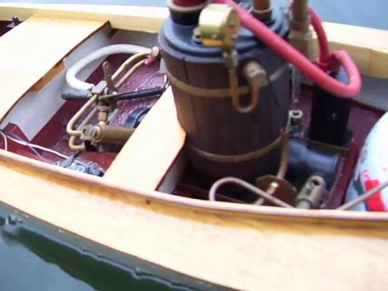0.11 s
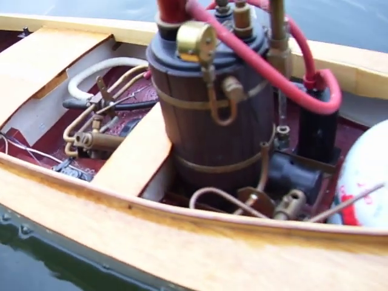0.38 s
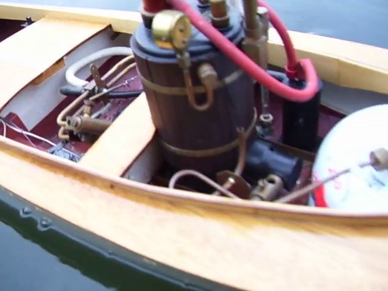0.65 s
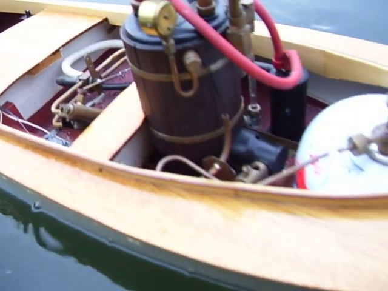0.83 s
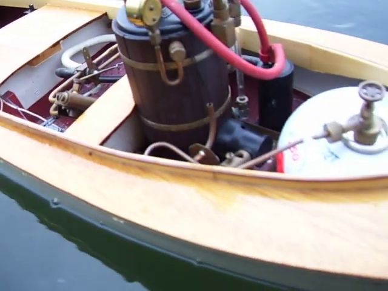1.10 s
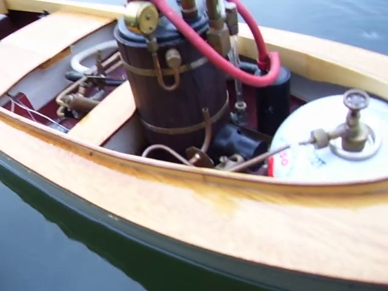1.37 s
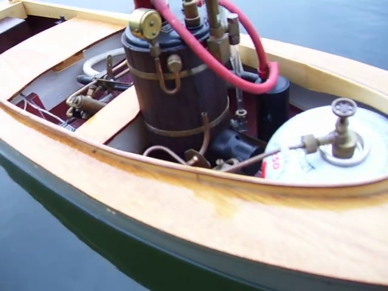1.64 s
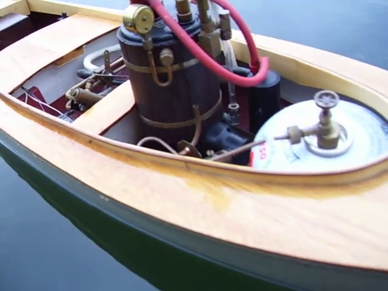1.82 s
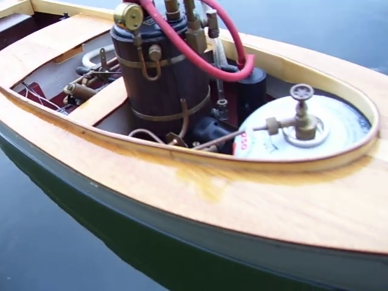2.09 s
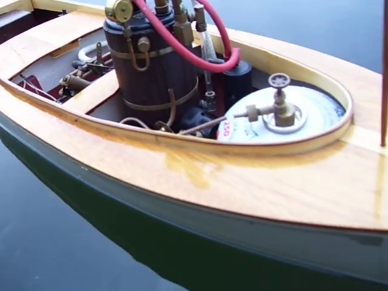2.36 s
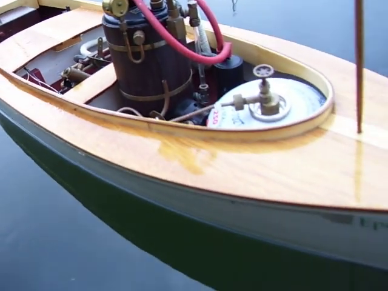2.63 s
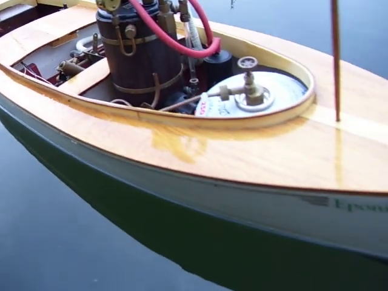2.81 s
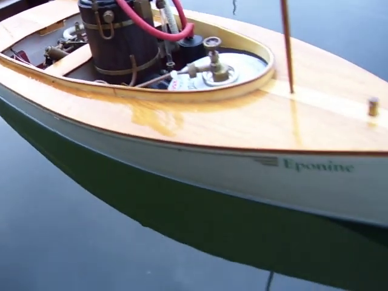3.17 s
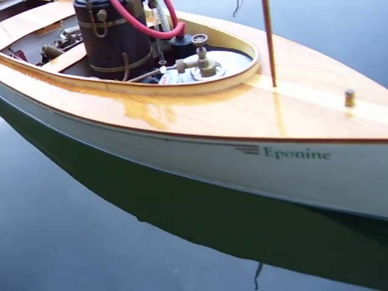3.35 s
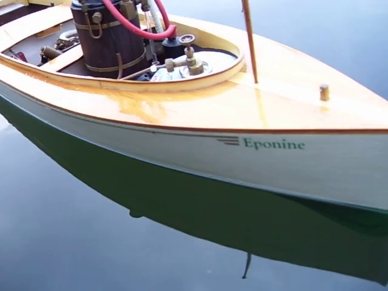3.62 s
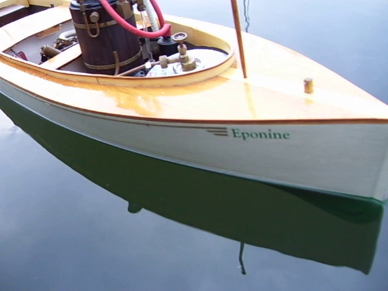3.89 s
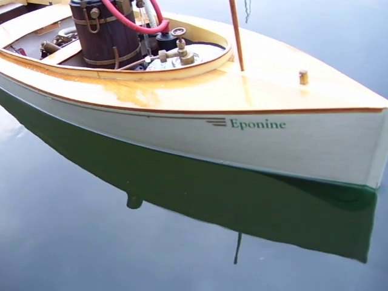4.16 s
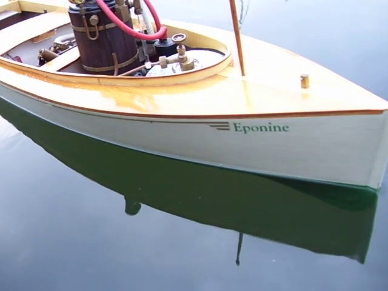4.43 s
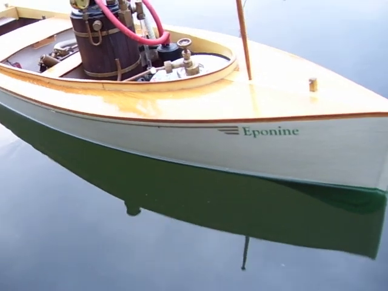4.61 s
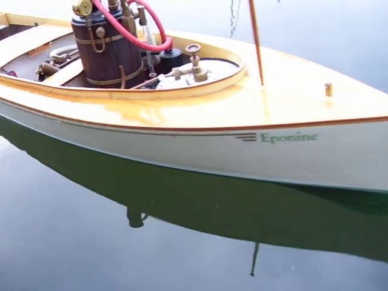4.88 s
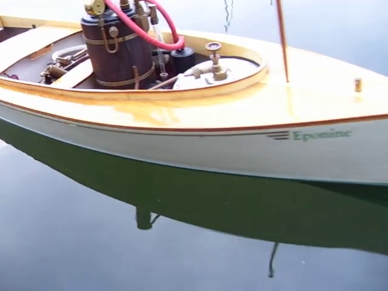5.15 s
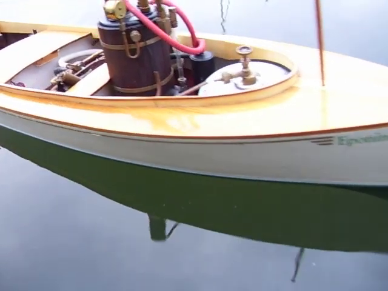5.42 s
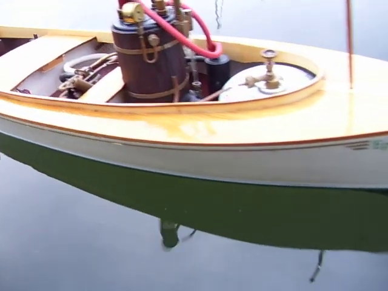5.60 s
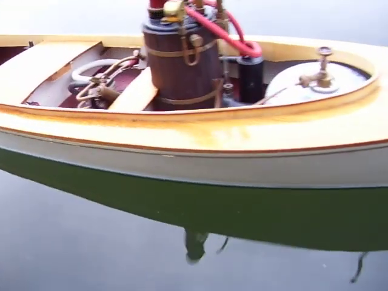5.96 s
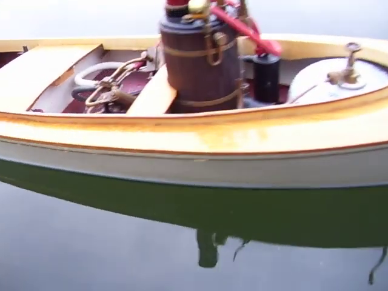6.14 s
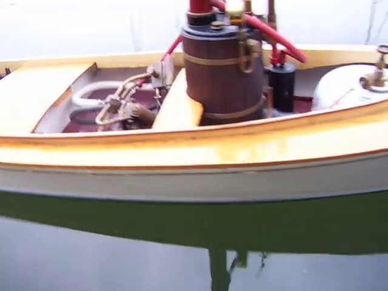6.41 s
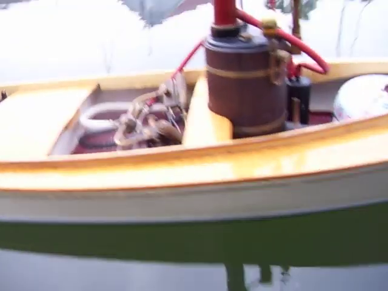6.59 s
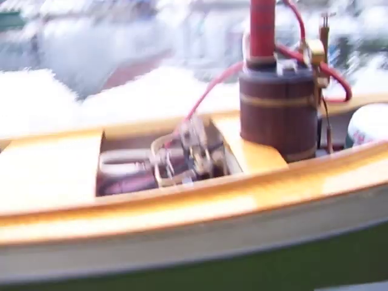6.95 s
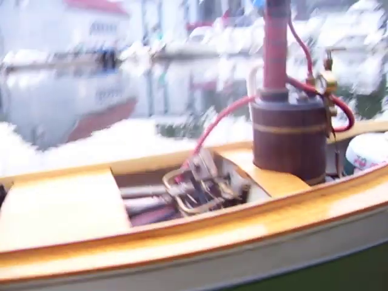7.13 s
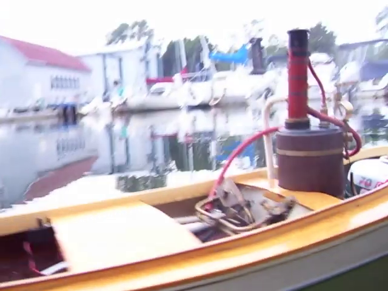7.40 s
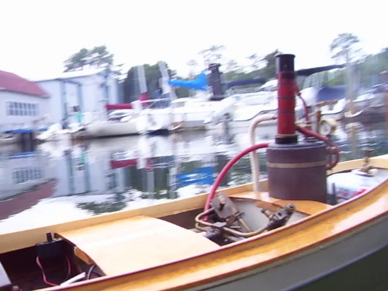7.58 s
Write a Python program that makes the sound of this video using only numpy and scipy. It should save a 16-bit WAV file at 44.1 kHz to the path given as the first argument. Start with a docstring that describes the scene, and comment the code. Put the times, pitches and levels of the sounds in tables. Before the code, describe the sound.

A model steam boat runs on calm water, close to a microphone that picks up little treble. Its gas burner roars steadily throughout, with a sputtering hiss of steam and a faint whistle that fades by 4 seconds. The engine gives wet, hollow chuffs in fits: a short run at the start, another from about 1.5 to 2 seconds, and a third from 2.5 to 3.3, with faint stray puffs between. A valve squeaks faintly at 1.5 and 2.3 seconds, and a little longer around 3.5. A light clack comes at 1.7 seconds and a sharper one at 2.4. From about 3.6 seconds the chuffs settle into a fast, even beat, growing louder as the boat passes and peaking around 6.5 to 7 seconds. A sharp clack lands at 7.2 seconds and a brief, louder squeal at 7.7. The loudest peaks overload slightly.

```python
"""A model steam launch chuffs past on calm water, close to a microphone that hears little treble.
Wet exhaust spits up its funnel and makes the tube ring, at first in fits, then in a fast beat.
The gas burner roars steadily with a faint whistle, spent steam hisses, and faint chuffs come at
random moments. A valve squeals four times and there are three sharp clacks.
The loudest peaks overload the microphone."""
import sys
import numpy as np
from scipy.fft import rfft, irfft, next_fast_len
from scipy.io import wavfile
from scipy.ndimage import uniform_filter1d, map_coordinates

SR = 44100
rng = np.random.default_rng(int(sys.argv[2]) if len(sys.argv) > 2 else 0)


def pcm_store(signal):
    """Save signal as 16-bit PCM."""
    levels = np.round(np.clip(np.atleast_2d(signal), -1, 1) * 32767)
    wavfile.write(sys.argv[1], SR, levels.astype(np.int16).T)


N = 342216

# the flame's tone colour: pitch_hz, level_db
FLAME_SPECTRUM = [(20, -41.5), (55, -13), (120, -8.5), (230, -2.5), (330, -2), (450, 2), (600, -4),
                  (900, -2), (1250, -11.5), (1450, -9.5), (1850, -16.5), (2150, -12), (2700, -28.5)]
# the low drone and upper ring of the flue, the pipe the flame burns in: pitch_hz, width_hz, gain_db
FLUE_MODES = [(606, 72, 2.5), (1477, 220, -1.5)]
# the upper ring fades as the boiler moves away: time_s, gain_db
FLUE_RING_FADE = [(0, 0.5), (2.3, -0.5), (4, -3.5), (7.76, -6)]
# how loud the burner roars: time_s, level_db
ROAR_LEVELS = [(0, -30.5), (1.7, -31.5), (3.4, -33), (6.3, -30.5), (7.76, -30.5)]
# the tone colour of spent steam: pitch_hz, level_db
HISS_SPECTRUM = [(600, -18), (1500, -7.5), (2300, 2), (3300, 6), (4500, -9)]
# the flow of spent steam, heard as hiss: time_s, level_db
STEAM_FLOW = [(0, -30.5), (.43, -40.5), (.84, -48.5), (1.36, -45.5), (1.69, -37.5), (2.1, -47.5),
              (3.26, -42), (3.46, -37), (4.36, -38), (6.03, -31), (6.51, -30), (7.39, -37.5), (7.76, -31)]
# the echo from the funnel's open ends: pitch_hz, gain_db
FUNNEL_ECHO = [(250, -34.5), (600, -13), (1400, -9.5), (2200, -27), (3500, -23.5)]
# how loud the burner whistles: time_s, level_db
WHISTLE_LEVELS = [(0, -48), (1.5, -46), (2.6, -51.5), (4, -62)]

# the crank, turning about eight to ten times a second: time_s, turns_done
CRANK_TURNS = [(-.021, 0), (.189, 2), (1.679, 15), (1.792, 16), (1.926, 17), (2.654, 23), (2.781, 24),
               (2.914, 25), (3.166, 27), (3.749, 32), (4.346, 37), (4.809, 41), (5.171, 44), (5.63, 48),
               (6.294, 54), (6.824, 59), (7.664, 67)]
# two cylinders push both ways, giving four strokes a turn that drift as the beat settles;
# one table per stroke: time_s, place_in_turn (0-1), ring_accent_db, spit_accent_db
STROKE_PATTERNS = [
    [(3.3, 0, 1, 0.5), (5.6, 0, 0, 1.5), (6.3, 0, -2, 2), (7.1, 0, -2.5, 2.5)],
    [(3.3, 0.28, 2, 3), (3.7, .31, 1, -3), (5.55, .30, .5, -3), (5.85, .30, 4, -1), (6.05, .30, 0, -2.5),
     (6.33, 0.31, 4.5, -2.5), (6.6, .325, 3.5, -3.5), (7.4, .325, 2, -0.5)],
    [(3.3, 0.46, -0.5, -2.5), (3.7, .42, -14.5, -8), (5.6, .43, -10, -11.5), (6.5, .43, -6.5, 4.5),
     (7.4, 0.43, -3, -5.5)],
    [(3.3, .67, -4, 0), (3.7, .59, 1, 3.5), (5.6, .58, 3.5, -0.5), (6.5, .565, -0.5, 0)],
]
# chuff strength, greatest as the funnel passes the microphone: time_s, ring_db, spit_db
CHUFF_LEVELS = [(.1, -18, -22.5), (1.7, -20.5, -27.5), (2.9, -19.5, -26), (3.3, -22, -27.5),
                (3.8, -17, -26.5), (4.05, -21.5, -26), (4.4, -19.5, -25), (5.1, -17, -23), (5.8, -15, -24),
                (6.5, -11, -22.5), (7.1, -11.5, -20), (7.5, -15, -20.5), (7.72, -15.5, -18)]
# stretches of time in which the strokes chuff: start_s, end_s
CHUFF_SPELLS = [(0, .26), (1.66, 1.98), (2.64, 3.33), (3.64, 7.75)]
# single exhaust chuffs, alone or accenting a stroke of the beat: start_s, ring_db, spit_db
SINGLE_CHUFFS = [(1.52, -18, -24.5), (1.855, -14.5, -26), (2.5, -20, -27), (2.606, -18.5, -31.5),
                 (2.654, -29, -25.5), (3.091, -22, -22.5), (3.561, -22.5, -27.5), (3.656, -17.5, -30),
                 (3.912, -14.5, -25), (4.178, -18, -26), (4.509, -29, -20.5)]
# the smokebox, a chamber under the funnel that rounds each kick: pitch_hz, width_hz, gain_db
SMOKEBOX_MODES = [(860, 480, 0)]
# the hollow bark of the exhaust: pitch_hz, width_hz, gain_db
BARK_MODES = [(643, 76, -4), (884.3, 66, 1), (1081, 115, -3.5)]
# hollows of the open hull, each heard while it faces the microphone:
# pitch_hz, width_hz, gain_db, facing_s, spread_s
HULL_MODES = [(736, 150, 3.5, 6.35, 0.85), (423, 110, 10, 7.49, 0.37), (825, 83, 4.5, 7.4, 0.4),
              (1058, 170, 5, 7.656, 0.76)]
# the tone colour of a spit of wet steam: pitch_hz, level_db
SPIT_SPECTRUM = [(200, -22.5), (500, -2), (1100, 0.5), (1650, 4.5), (2200, 2), (2700, 0.5), (3400, -0.5),
                 (4500, -8)]

# the valve, one table per squeal: time_s, pitch_hz, level_db
VALVE_SQUEALS = [
    [(1.44, 3200, -41), (1.525, 3360, -28.5), (1.545, 3210, -57)],
    [(2.26, 3100, -46), (2.30, 3240, -33), (2.35, 3140, -40)],
    [(3.32, 2775, -31), (3.355, 3130, -26.5), (3.412, 3406, -26.5), (3.45, 3170, -30), (3.475, 3206, -25),
     (3.525, 3260, -27.5), (3.545, 3284, -24.5), (3.59, 3110, -25.5), (3.61, 3200, -46.5)],
    [(7.668, 2785, -29), (7.69, 2986, -12), (7.716, 2950, -27)],
]
# how much of each squeal is hiss rather than tone: hiss_share (0-1)
SQUEAL_HISS_SHARES = [.88, .9, .3, .12]
# sharp clacks: start_s, level_db
CLACK_HITS = [(1.681, -23.5), (2.4292, -11), (7.2394, -8.5)]
# the notes a clack rings with: pitch_hz, level_db, ring_s (time to fall by 60 dB)
CLACK_NOTES = [(1270, -6, .026), (1900, 0, .018), (2230, -4, .013), (2950, -8, .011), (3480, -6, .008)]
# the tone colour of the crack that starts a clack: pitch_hz, level_db
CRACK_SPECTRUM = [(800, -26), (1700, 4), (4200, -4), (5000, -30.5)]
# how the microphone loses treble: pitch_hz, gain_db
MIC_RESPONSE = [(3450, -2), (3800, -9), (4200, -17), (4500, -31), (4800, -72.5), (5200, -110)]


def amp(db):
    """Turn decibels into a number to multiply by."""
    return 10 ** (np.asarray(db) / 20)


def unit(x):
    """Scale each sound to an average (rms) level of 1."""
    return x / np.sqrt(np.mean(x ** 2, axis=-1, keepdims=True) + 1e-20)


def shape(points, hz):
    """The gain at each pitch, joining up rows of pitch_hz, gain_db."""
    pitch_hz, gain_db = np.transpose(points)
    return amp(np.interp(np.log(hz + 1), np.log(pitch_hz), gain_db))


def read(rows, times):
    """Look up each column after time_s at the given times."""
    time_s, *columns = np.transpose(rows)
    return [np.interp(times, time_s, column) for column in columns]


def curves(rows):
    """Look up each column after time_s at every sample."""
    return read(rows, np.arange(N) / SR)


def wobble(rate):
    """A smooth curve through `rate` random values a second."""
    return map_coordinates(rng.standard_normal(int(N * rate / SR) + 4), [np.arange(N) * rate / SR])


def filtered(x, response):
    """Make each pitch in x stronger or weaker, as response(hz) says."""
    size = x.shape[-1]
    padded = next_fast_len(2 * size)
    return irfft(rfft(x, padded) * response(np.fft.rfftfreq(padded, 1 / SR)), padded)[..., :size]


def resonances(modes, hz):
    """How a hollow space answers: it rings near each of its modes, the pitches it favours."""
    return sum((-1) ** k * amp(db) * 1j * hz * width / (pitch ** 2 - hz ** 2 + 1j * hz * width)
               for k, (pitch, width, db) in enumerate(modes))


def noise(spectrum):
    """Steady noise with the given tone colour."""
    return unit(filtered(rng.standard_normal(N), lambda hz: shape(spectrum, hz)))


def bursts(count, rise_s, decay_s, size=2600):
    """Puffs of swirling air that swell fast and fall more slowly, each with energy 1."""
    t = np.arange(size) / SR
    envelope = (1 - np.exp(-(t / rise_s) ** 2)) * np.exp(-t / decay_s)
    return unit(rng.standard_normal((count, size)) * envelope) / np.sqrt(size)


def placed(start_s, level_db, sounds, span_s=.01):
    """Lay short sounds on the time line; each has its level as if squeezed into span_s."""
    size = sounds.shape[1]
    sounds = unit(sounds) * np.sqrt(span_s * SR / size) * amp(level_db)[:, None]
    samples = np.round(np.maximum(start_s, 0) * SR).astype(int)[:, None] + np.arange(size)
    return np.bincount(samples.ravel(), sounds.ravel(), N)[:N]


def funnel(hz, lowest_note_hz=293.1):
    """Sound bounces up and down the open tube, which boosts evenly spaced pitches."""
    echo = np.minimum(shape(FUNNEL_ECHO, hz), .9)
    return 1 / (1 - echo * np.exp(-2j * np.pi * hz / lowest_note_hz))


def boiler(roar_gain_db=5.0, hiss_gain_db=3, flicker_db=0.63, sputter_db=3.0):
    """The flame roars in its flue and spent steam sputters, both sounding through the funnel."""
    roar_db, = curves(ROAR_LEVELS)
    hiss_db, = curves(STEAM_FLOW)
    ring_db, = curves(FLUE_RING_FADE)
    flame = noise(FLAME_SPECTRUM)
    drone, ring = (filtered(flame, lambda hz: resonances([mode], hz)) for mode in FLUE_MODES)
    flue = unit(flame + drone + amp(ring_db) * ring)
    roar = amp(roar_db + roar_gain_db + flicker_db * wobble(30)) * flue
    hiss = amp(hiss_db + hiss_gain_db + sputter_db * wobble(140)) * noise(HISS_SPECTRUM)
    return filtered(roar + hiss, funnel)


def burner_whistle(pitch_hz=1577, waver_hz=4, flutter_db=3.0):
    """The burner's gas jet sings on one faint, unsteady note."""
    level_db, = curves(WHISTLE_LEVELS)
    loudness = amp(level_db + flutter_db * wobble(12))
    phase = 2 * np.pi * np.cumsum(pitch_hz + waver_hz * wobble(25)) / SR
    return loudness * np.sin(phase)


def engine_strokes(scatter_db=1.36, jitter_s=.0007):
    """The crank times the chuffs, each a little uneven. Gives rows of start_s, ring_db, spit_db."""
    crank_s, turns_done = np.transpose(CRANK_TURNS)
    turns = np.arange(turns_done[-1] + 1)
    turn_start_s = np.interp(turns, turns_done, crank_s)
    turn_length_s = np.diff(turn_start_s, append=2 * turn_start_s[-1] - turn_start_s[-2])
    rows = []
    for pattern in STROKE_PATTERNS:
        place, ring_accent_db, spit_accent_db = read(pattern, turn_start_s)
        time_luck, ring_luck, spit_luck = rng.standard_normal((len(turns), 3)).T
        start_s = turn_start_s + place * turn_length_s + jitter_s * time_luck
        ring_db, spit_db = read(CHUFF_LEVELS, start_s)
        ring_db += ring_accent_db + scatter_db * ring_luck
        spit_db += spit_accent_db + scatter_db * spit_luck
        rows.append([start_s, ring_db, spit_db])
    rows = np.hstack(rows).T
    in_spell = [(rows[:, 0] > start) & (rows[:, 0] < end) for start, end in CHUFF_SPELLS]
    return rows[np.any(in_spell, axis=0)]


def spits(count, droplet_hz=2100, scatter=0.33, width_hz=300):
    """Wet steam sprays up the funnel; bursting droplets give each spray its own bright pitch."""
    bright_hz = droplet_hz * np.exp(scatter * rng.standard_normal((count, 1)))
    boost = lambda hz: 1 + np.exp(-((hz - bright_hz) / width_hz) ** 2)
    spray = bursts(count, rise_s=.0014, decay_s=.006)
    return filtered(spray, lambda hz: shape(SPIT_SPECTRUM, hz) * boost(hz) * funnel(hz))


def barks(start_s, wake_db=0, wake_gain=1.51, kick_delay_s=0.003):
    """A kick of pressure and its wake of swirling steam make the funnel and hull ring."""
    push = wake_gain * amp(wake_db) * bursts(len(start_s), rise_s=.004, decay_s=.0075)
    push[:, round(kick_delay_s * SR)] += 1  # the kick
    push = filtered(push, lambda hz: resonances(SMOKEBOX_MODES, hz))
    ring = filtered(push, lambda hz: resonances(BARK_MODES, hz) * funnel(hz))
    for *mode, facing_s, spread_s in HULL_MODES:
        facing = np.exp(-((start_s - facing_s) / spread_s) ** 2)[:, None]
        ring -= facing * filtered(push, lambda hz: resonances([mode], hz))
    return ring


def exhaust(ring_gain_db=1, spit_gain_db=3.0, snap=0.26):
    """Each chuff spits, then barks; in strong ones the kick stands out more from its wake."""
    start_s, ring_db, spit_db = np.vstack([SINGLE_CHUFFS, engine_strokes()]).T
    wake_db = -snap * np.maximum(ring_db - ring_db.mean(), 0)
    bark = placed(start_s, ring_db + ring_gain_db, barks(start_s, wake_db[:, None]))
    spit = placed(start_s, spit_db + spit_gain_db, spits(len(start_s)))
    return bark + spit


def faint_chuffs(count=80, spit_gain_db=2, ring_gain_db=5, scatter_db=4.0):
    """Faint chuffs and spits of exhaust at random moments, louder when more steam flows."""
    start_s = rng.uniform(0, N / SR, count)
    level_db = read(STEAM_FLOW, start_s)[0] + scatter_db * rng.standard_normal(count)
    spit = placed(start_s, level_db + spit_gain_db, spits(count))
    bark = placed(start_s, level_db + ring_gain_db, barks(start_s))
    return spit + bark


def valve(flutter_hz=165, flutter_depth=0.33, swing_hz=70, jitter_hz=40,
          hiss_width_hz=750, hiss_below_hz=130, gain_db=-1):
    """Steam squeals through a narrow, fluttering gap: a rough tone inside a band of hiss."""
    t = np.arange(N) / SR
    flutter = np.sin(2 * np.pi * np.cumsum(flutter_hz + 12 * wobble(40)) / SR)
    waver_hz = jitter_hz * wobble(420) - swing_hz * flutter
    squeals = np.zeros(N)
    for rows, hiss_share in zip(VALVE_SQUEALS, SQUEAL_HISS_SHARES):
        pitch_hz, level_db = curves(rows)
        is_open = (t > rows[0][0]) & (t < rows[-1][0])
        fade = uniform_filter1d(is_open.astype(float), size=300)
        phase = 2 * np.pi * np.cumsum(pitch_hz + waver_hz) / SR
        tone = np.sqrt(2 * (1 - hiss_share)) * np.sin(phase)
        # the band of hiss follows the tone, centred just below it
        swirl = wobble(hiss_width_hz) + 1j * wobble(hiss_width_hz)
        band = swirl * np.exp(1j * (phase - 2 * np.pi * hiss_below_hz * t))
        hiss = np.sqrt(hiss_share) * unit(band.real)
        squeals += fade * amp(level_db + gain_db) * (tone + hiss)
    return squeals * (1 + flutter_depth * flutter)


def clacks(size=2000, rise_s=.0015, crack_db=4, crack_decay_s=0.0025):
    """Hard, bright knocks: a crack of noise and a ring that dies almost at once."""
    start_s, level_db = np.transpose(CLACK_HITS)
    t = np.arange(size) / SR
    swell = 1 - np.exp(-t / rise_s)
    phase = rng.uniform(0, 2 * np.pi, (len(start_s), len(CLACK_NOTES)))
    ring = sum(amp(db) * 10 ** (-3 * t / ring_s) * np.sin(2 * np.pi * hz * t + phase[:, [k]])
               for k, (hz, db, ring_s) in enumerate(CLACK_NOTES))
    white = rng.standard_normal((len(start_s), size))
    bright = unit(filtered(white, lambda hz: shape(CRACK_SPECTRUM, hz)))
    crack = amp(crack_db) * bright * np.exp(-t / crack_decay_s)
    return placed(start_s, level_db, (ring + crack) * swell)


def scene():
    """All the boat's sounds add up in one channel."""
    return (exhaust() + faint_chuffs() + clacks() + boiler() + valve() + burner_whistle())[None]


def record(dry, ceiling=.76, hardness=16, top_hz=15800):
    """The microphone dulls the treble; overload rounds off the loudest peaks, adding faint ticks."""
    dulled = filtered(dry, lambda hz: shape(MIC_RESPONSE, hz))
    rounded = dulled / (3.0 + np.abs(dulled / ceiling) ** hardness) ** (1 / hardness)
    return filtered(rounded, lambda hz: hz < top_hz)


dry = scene()
out = record(dry)
pcm_store(out)
```